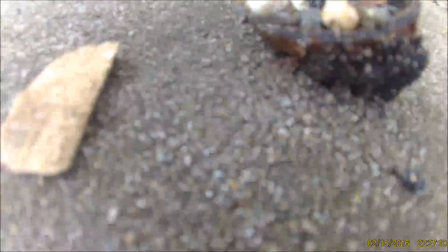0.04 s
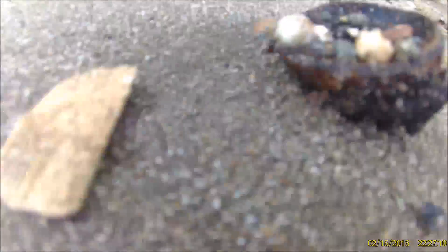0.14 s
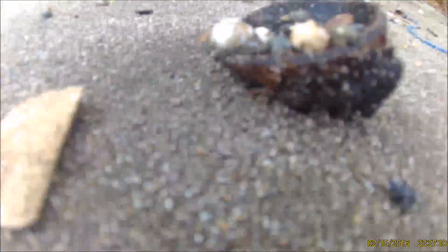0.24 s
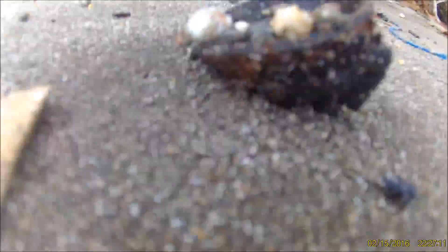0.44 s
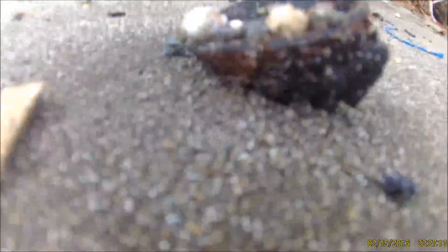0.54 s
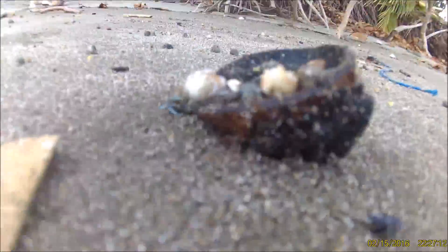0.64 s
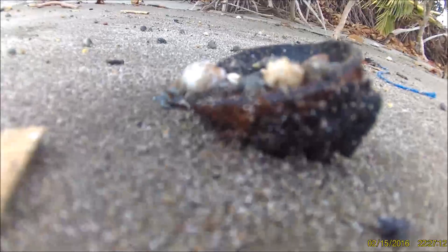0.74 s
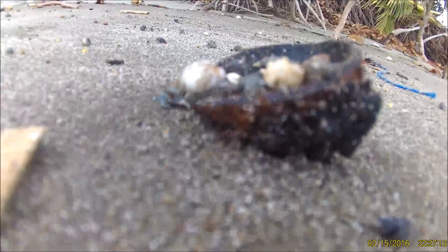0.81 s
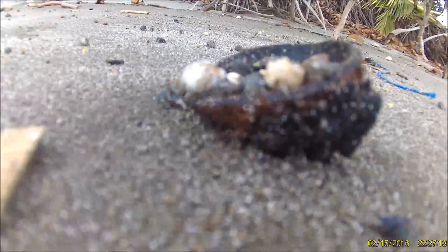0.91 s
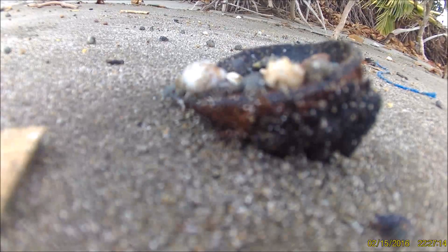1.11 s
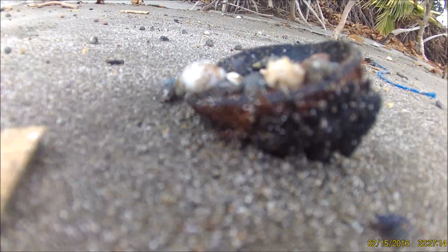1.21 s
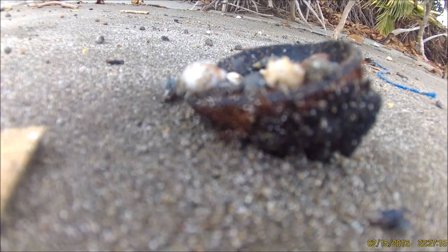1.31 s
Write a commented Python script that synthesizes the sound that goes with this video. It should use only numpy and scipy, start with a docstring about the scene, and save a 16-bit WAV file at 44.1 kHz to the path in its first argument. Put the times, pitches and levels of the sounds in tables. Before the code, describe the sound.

Bright, sandy scraping on a plastic camera case starts with a small click, swells into a longer rub, then shorter strokes and a strong final rasp, a last click, and only distant surf and wind remain.

```python
"""Beach sand: a small camera is shifted by hand; gritty fingers rub its plastic case in strokes.
Rubbing is grain noise through case resonances plus a low body; clicks and rings are decaying sines.
The grip thumps the microphone with short sine pulses over low rumble noise.
Far surf and wind are shaped noise, hissing underneath."""
import sys
import numpy as np
from scipy import signal
from scipy.fft import rfft, irfft, next_fast_len
from scipy.io import wavfile
from scipy.ndimage import map_coordinates

SR = 44100
rng = np.random.default_rng(int(sys.argv[2]) if len(sys.argv) > 2 else 0)


def file_out(sig):
    """Save sig as 16-bit WAV at sys.argv[1]."""
    # one column per channel
    cols = np.atleast_2d(sig).T
    # limit, then scale
    lim = np.clip(cols, -1, 1)
    pcm = np.round(lim * 32767).astype(np.int16)
    wavfile.write(sys.argv[1], SR, pcm)


def attenuation_scalar(level_db):
    """Turn a level in dB into a linear amplitude multiplier (20 dB per decade)."""
    decades = np.asarray(level_db, float) / 20
    return 10 ** decades


N = 59535


def unit(x):
    """Scale to rms 1."""
    return x / np.sqrt(np.mean(x ** 2) + 1e-20)


def curves(rows):
    """One value per sample for each column after the time; -120 after the last row."""
    time_s, *columns = np.transpose(rows)
    return [np.interp(np.arange(N) / SR, time_s, c, right=-120) for c in columns]


def wobble(knots_per_s):
    """Smooth random curve through normal knots."""
    knots = rng.standard_normal(int(N * knots_per_s / SR) + 4)
    return map_coordinates(knots, [np.arange(N) * knots_per_s / SR])


def filtered(x, response):
    """x times a complex response of frequency."""
    m = next_fast_len(N + 8192)
    return irfft(rfft(x, m) * response(np.fft.rfftfreq(m, 1 / SR)), m)[:N]


def colour(points):
    """Gain from (frequency [Hz], gain [dB]) points on a log axis."""
    f, db = np.transpose(points)
    return lambda hz: attenuation_scalar(np.interp(np.log(hz + 1), np.log(f + 1), db))


# surf and wind spectrum: (frequency [Hz], relative density [dB per Hz])
SURF_SPECTRUM = [(15, -50), (25, -32), (70, -22), (110, -2), (170, -11.5), (242, -1.5), (309, -8),
                 (607, -8), (1300, -11), (2050, -12.5), (4300, -14.5), (5900, -10.5), (7500, -16.5),
                 (11000, -26), (16000, -27)]
SURF_DB = -51.5


def surf():
    """Far surf and wind: a steady noise wash that breathes slightly."""
    wash = unit(filtered(rng.standard_normal(N), colour(SURF_SPECTRUM)))
    breath_db = 0.51 * wobble(3.6) + 1.32 * wobble(24.95)
    return attenuation_scalar(SURF_DB + breath_db) * wash


# hand tremor on the case: (time [s], rumble level before RUMBLE_GAIN_DB [dB])
TREMOR = [(0.0, -60.5), (0.042, -57), (0.064, -63), (0.1, -52.5), (0.142, -55), (0.19, -54.5), (0.232, -56),
          (0.288, -51.5), (0.356, -60), (0.4, -59), (0.47, -51), (0.568, -60), (0.604, -67), (0.63, -57.5),
          (0.656, -58.5), (0.74, -53), (0.79, -50), (0.83, -57), (0.86, -54), (0.884, -79), (0.92, -75)]
RUMBLE_GAIN_DB, LUMP_SD_DB, LUMPS_PER_S = 1.6, 4.24, 45.94
# grip thumps: (time [s], level [dB], frequency [Hz], length scale [cycles])
GRIP_THUMPS = [(0.108, -41, 128, 1.8), (0.1442, -28, 390, 2.1), (0.1448, -26, 720, 1.5),
               (0.167, -50, 79, 1.2), (0.288, -34, 171, 1.5), (0.523, -34, 155, 2.8),
               (0.542, -27, 257, 1.2), (0.566, -35, 170, 1.2), (0.622, -35, 187, 0.72),
               (0.8353, -25.5, 135, 1), (0.844, -33.5, 310, 1.8)]


def grip():
    """Soft hand pushes as sine pulses, with a lumpy tremor of low noise."""
    out, t = np.zeros(N + SR), np.arange(SR // 10) / SR
    for time_s, level_db, hz, cycles in GRIP_THUMPS:
        u = t * hz / cycles
        envelope = 4.17 * u * np.exp(-2.4 * u)
        out[round(time_s * SR):][:len(t)] += attenuation_scalar(level_db) * envelope * np.sin(2 * np.pi * hz * t)
    tremor_db, = curves(TREMOR)
    spectrum = colour([(10, -30), (30, -7.5), (80, 0.5), (180, -5), (400, -12.5), (1000, -87)])
    rumble = unit(filtered(rng.standard_normal(N), spectrum))
    return out[:N] + attenuation_scalar(tremor_db + RUMBLE_GAIN_DB + LUMP_SD_DB * wobble(LUMPS_PER_S)) * rumble


GRAINS_PER_S, GRAIN_SPREAD_DB = 9000, 4
SMOOTH_POWER_SHARE, CHATTER_SD_DB, CHATTER_KNOTS_PER_S = .5, 1.6, 220


def grit():
    """Sand grains catching at random, of uneven size, over smooth skin friction."""
    caught = rng.random(N) < GRAINS_PER_S / SR
    size = attenuation_scalar(GRAIN_SPREAD_DB * np.clip(rng.standard_normal(N), -2, 2))
    sign = np.sign(rng.random(N) - .5)
    grains = np.sqrt(1 - SMOOTH_POWER_SHARE) * unit(caught * size * sign)
    friction = np.sqrt(SMOOTH_POWER_SHARE) * rng.standard_normal(N)
    return (grains + friction) * attenuation_scalar(CHATTER_SD_DB * wobble(CHATTER_KNOTS_PER_S))


# case and microphone port resonances: (frequency [Hz], width [Hz], gain [dB])
CASE_MODES = [(3470, 496, -6), (4040, 510, -6), (5887, 850, 0.3), (7904, 844, -4), (9190, 340, -12),
              (11580, 720, -9.5), (12950, 930, -12.5), (15700, 870, -18)]
HIGHPASS_HZ, HIGHPASS_DAMPING = 2900, .9


def case_response(f):
    """Case resonances of alternating sign, through a second-order high-pass."""
    modes = 0
    for k, (hz, width_hz, db) in enumerate(CASE_MODES):
        bandpass = 1j * f * width_hz / (hz * hz - f * f + 1j * f * width_hz)
        modes = modes + (-1) ** k * attenuation_scalar(db) * bandpass
    r = f / HIGHPASS_HZ
    return modes * (1j * r) ** 2 / (1 + HIGHPASS_DAMPING * 1j * r - r ** 2)


# rubbing, one list per stroke: (time [s], level [dB], low body under pressure [dB re level])
STROKES = [
    [(0.02, -71.5, -15), (0.045, -56, -9), (0.072, -41.5, -8), (0.092, -65, 5), (0.122, -53.5, 1),
     (0.133, -48, -8), (0.137, -34, -4), (0.143, -40, -6), (0.148, -32.5, -8.5), (0.16, -35.5, -16),
     (0.165, -53, -6), (0.168, -45.5, 4), (0.173, -58, 0), (0.19, -60, -13)],
    [(0.196, -42, 0), (0.205, -38, -18), (0.209, -27.5, -20), (0.234, -18.5, -33), (0.242, -25.5, -19),
     (0.251, -25.5, -24), (0.255, -35, -16), (0.262, -24.5, -19), (0.268, -22.5, -20), (0.273, -15, -30),
     (0.281, -18.5, -22), (0.286, -20, -25), (0.296, -21.5, -22.5), (0.306, -25, -22), (0.352, -25, -20),
     (0.364, -22.5, -18.5), (0.392, -23, -19), (0.406, -21.5, -40), (0.422, -22, -15), (0.45, -21.5, -26),
     (0.47, -20.5, -14), (0.488, -19.5, -14), (0.496, -28.5, -14), (0.504, -43.5, -10)],
    [(0.512, -37, -14), (0.522, -27, -10), (0.526, -24, -28), (0.536, -24.5, -25), (0.54, -27, -20),
     (0.547, -28, -11), (0.562, -30, -27), (0.568, -42, -19), (0.573, -34, -16.5), (0.582, -39.5, -14),
     (0.592, -49.5, -12)],
    [(0.604, -48, -20), (0.618, -39.5, -18), (0.626, -49, -8), (0.644, -33.5, -18), (0.668, -27.5, -16),
     (0.678, -32.5, -17), (0.684, -40, -10)],
    [(0.692, -25.5, -17), (0.716, -17, -18.5), (0.728, -13, -12.5), (0.748, -11, -16),
     (0.766, -13.5, -13.5), (0.776, -28.5, -10), (0.786, -51.5, -6), (0.794, -51, -2)],
    [(0.802, -49, -17), (0.824, -48.5, -18), (0.832, -31.5, -20), (0.836, -40.5, -4), (0.839, -52, -3),
     (0.85, -49, -3), (0.87, -64, -9), (0.88, -67, -6)],
]
# treble of each stroke, dull for skin and bright for sand: gain above TREBLE_HZ [dB]
STROKE_TREBLE = [-12, 1.7, -1, 1.5, -0.8, 3]
TREBLE_HZ = 9700
# low body spectrum: (frequency [Hz], relative density [dB per Hz])
BODY_SPECTRUM = [(120, -17), (250, -14.5), (400, -1), (720, -2.5), (1500, -1), (1900, -6), (2500, -8.5),
                 (3500, -7), (6600, -120)]


def rubbing():
    """Grit excites the case resonances; pressure adds a low body."""
    rows = [(*row, db) for stroke, db in zip(STROKES, STROKE_TREBLE) for row in stroke]
    level_db, body_db, treble_db = curves(rows)
    source = grit()
    steady_rms = np.sqrt(np.mean(filtered(source, case_response) ** 2))
    hiss = filtered(source * attenuation_scalar(level_db), case_response) / steady_rms
    treble = filtered(hiss, lambda f: 1 / (1 + (TREBLE_HZ / (f + 1)) ** 20))
    body = unit(filtered(grit(), colour(BODY_SPECTRUM)))
    return hiss + (attenuation_scalar(treble_db) - 1) * treble + attenuation_scalar(level_db + body_db) * body


# cracks of the case: (time [s], level [dB], centre of excited modes [Hz])
CRACKS = [(0.1453, -8.5, 5100), (0.145, -19, 7630), (0.2104, -17, 6100), (0.2334, -15.5, 5840),
          (0.2734, -16, 6100), (0.2772, -7, 6660), (0.5239, -5.5, 6100), (0.5431, -10.5, 6000),
          (0.5447, -8, 8700), (0.844, -18.5, 5700), (0.8436, -12.5, 7800), (0.8443, -11.5, 14000)]
# short modes of every crack: (frequency [Hz], relative level [dB], t60 [s])
CRACK_MODES = [(810, -4.5, 0.0056), (1740, 3, 0.0034), (2310, 0, 0.0037), (4164, 13.5, 0.0031),
               (5350, 1.5, 0.0053), (6100, 4, 0.0061), (7720, -10.5, 0.012), (8700, 3.5, 0.005),
               (11500, -2, 0.0024), (14000, -1.5, 0.0026), (15300, -14, 0.0046)]
CRACK_REACH_OCT, CRACK_FALL_DB, CRACK_ATTACK_S, MODE_SCATTER_DB = .26, 21, .0001, 2
# shell flicked or squeezed: (time [s], level before SHELL_GAIN [dB], frequency [Hz], t60 [s])
SHELL_RINGS = [(0.142, -28, 3540, 0.019), (0.2445, -16.5, 3470, 0.024), (0.2490, -17, 3484, 0.031),
               (0.5237, -12.5, 3340, 0.037), (0.5440, -12.5, 3470, 0.041), (0.8437, -9.5, 3590, 0.013)]
RING_ATTACK_S = .0004
SHELL_GAIN = 1 + attenuation_scalar(-17.5)  # overall loudness of the shell rings


def clicks():
    """A crack excites short modes, strongest near its centre; the shell rings on one tone."""
    out, t = np.zeros(N + SR), np.arange(SR // 10) / SR
    scatter_db = MODE_SCATTER_DB * rng.standard_normal((len(CRACKS), len(CRACK_MODES)))
    for (time_s, level_db, centre_hz), vary_db in zip(CRACKS, scatter_db):
        crack = np.zeros(len(t))
        for (hz, db, t60_s), v_db in zip(CRACK_MODES, vary_db):
            distance = np.log2(hz / centre_hz) / CRACK_REACH_OCT
            fall_db = CRACK_FALL_DB * (1 - np.exp(-distance ** 2))
            crack += attenuation_scalar(db + v_db - fall_db - 60 * t / t60_s) * np.sin(2 * np.pi * hz * t)
        attack = 1 - np.exp(-t / CRACK_ATTACK_S)
        out[round(time_s * SR):][:len(t)] += attenuation_scalar(level_db) * attack * crack
    for time_s, level_db, hz, t60_s in SHELL_RINGS:
        envelope = attenuation_scalar(level_db - 60 * t / t60_s) * (1 - np.exp(-t / RING_ATTACK_S))
        out[round(time_s * SR):][:len(t)] += SHELL_GAIN * envelope * np.sin(2 * np.pi * hz * t)
    return out[:N]


def scene():
    """All sources sum at one microphone."""
    return (surf() + grip() + rubbing() + clicks())[None]


def low_pass(x):
    """Removes everything above the highest recorded frequency."""
    return signal.sosfilt(signal.butter(12, 16830, fs=SR, output="sos"), x)


def record(dry):
    """Band-limit the mix sharply and finish it."""
    top_hz = 15760
    mix = filtered(dry[0], lambda hz: hz < top_hz)[None]
    return low_pass(mix)


dry = scene()
out = record(dry)
file_out(out)
```